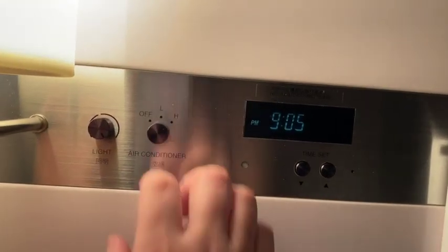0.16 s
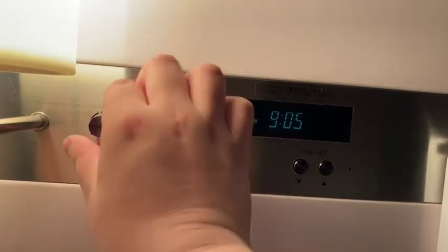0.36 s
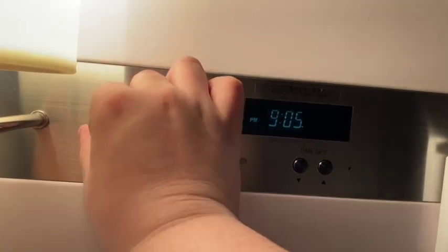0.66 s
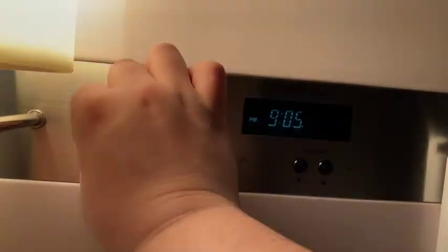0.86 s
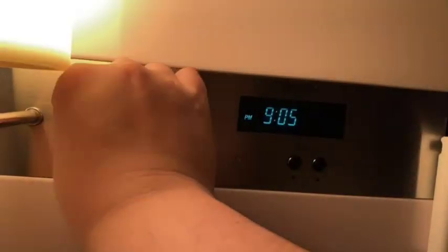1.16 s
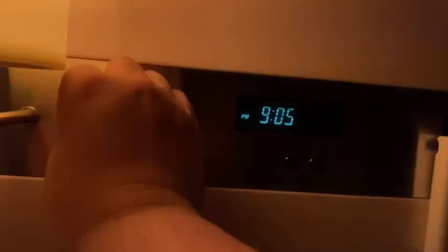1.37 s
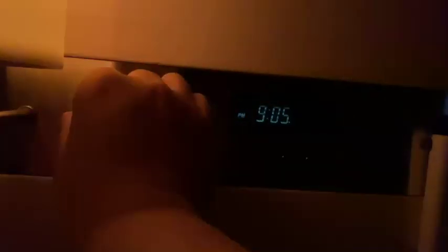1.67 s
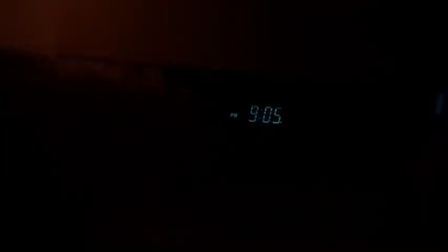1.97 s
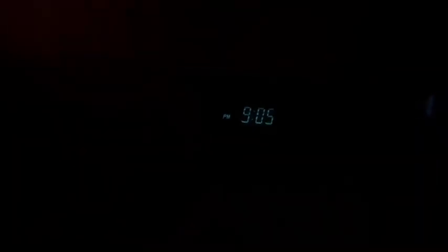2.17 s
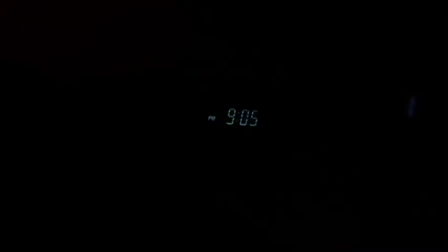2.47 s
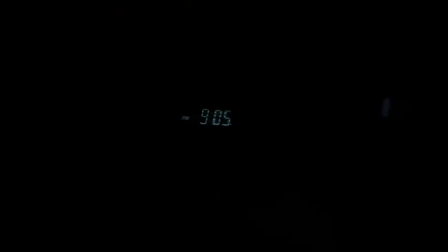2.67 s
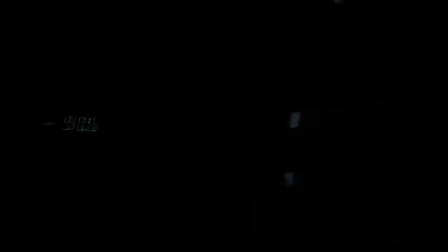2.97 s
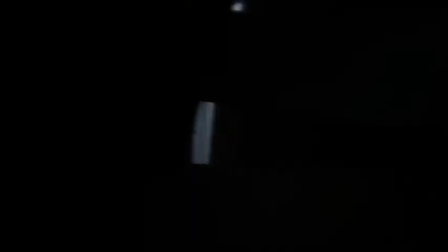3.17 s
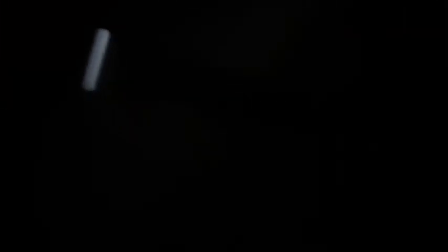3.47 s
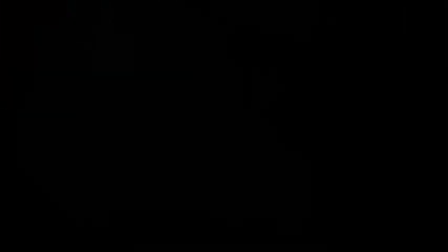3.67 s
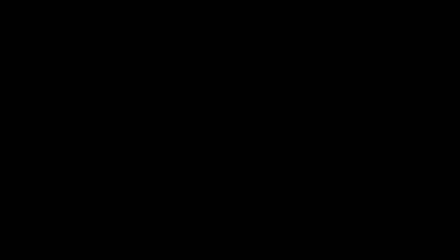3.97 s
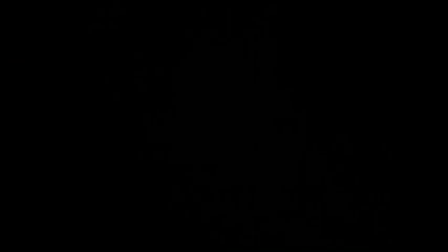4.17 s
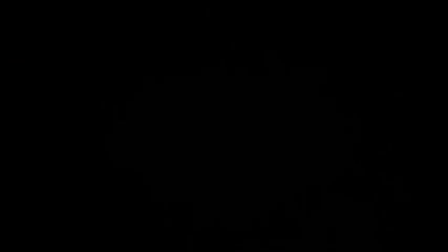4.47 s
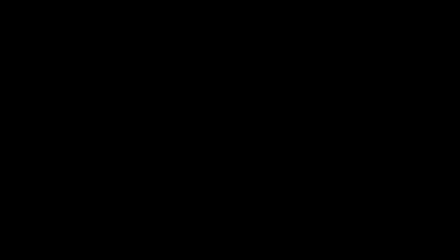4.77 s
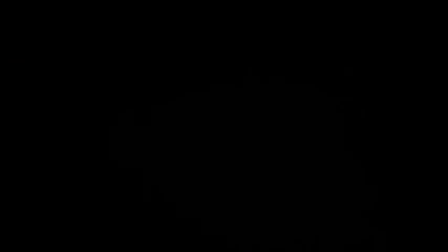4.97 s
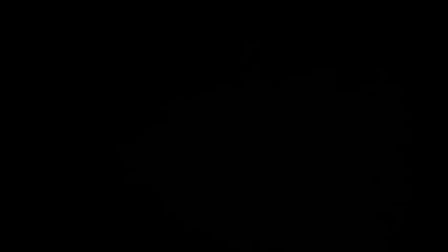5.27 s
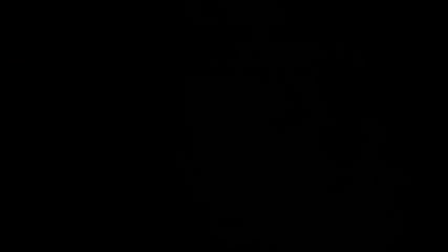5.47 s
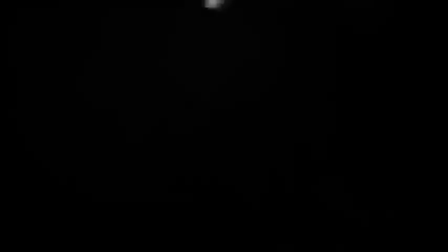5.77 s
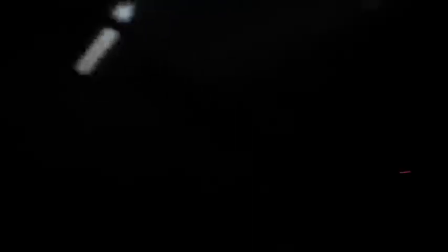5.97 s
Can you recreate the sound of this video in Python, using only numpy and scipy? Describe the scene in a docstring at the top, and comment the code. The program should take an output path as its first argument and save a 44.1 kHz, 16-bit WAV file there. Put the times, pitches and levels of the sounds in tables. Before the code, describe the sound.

A small, close-walled sleeping cabin, heard through a hand-held stereo microphone. Soft low ventilation rumbles steadily throughout, with little treble. From 0.2 to 1.6 seconds fingers very faintly knock and brush a knob and metal panel; slightly firmer dull taps come at 2.0. At about 2.45 a stiff switch snaps: a tight cluster of contacts within some hundredths of a second, bright at first, then heavier, ringing the thin metal. The wall answers with a short hollow boom near 260 hertz and a rattle fading within about 0.3 seconds. Small bumps follow around 2.7 to 2.9. From 3.0 bedding rushes and rubs, while a rough, sagging creak groans from 3.3 to 3.8. A sharp tick falls at 3.9. Cloth movement is strongest around 4.4 to 4.85, with low microphone thuds, then eases. Another tick and knock come at 5.4, a knock at 5.57; rustling continues until 6.1.

```python
"""In a small sleeping cabin with softly rumbling ventilation, a knob switch on a metal wall panel snaps over.
Fingers knock and brush the panel before; afterwards someone turns over, bedding rushes and rubs,
the frame creaks and the hand-held microphone takes up low bumps. Shaped noise makes the air, the bedding
and the rattle of the walls; struck resonances make the panel and the knocks; wavering tones the boom and creak."""
import sys
import numpy as np
from scipy import signal
from scipy.fft import rfft, irfft, next_fast_len
from scipy.io import wavfile

SR = 44100
rng = np.random.default_rng(int(sys.argv[2]) if len(sys.argv) > 2 else 0)


def waveform_to_disk(signal):
    """Save audio, clipped to [-1, 1], as 16-bit WAV at the path in sys.argv[1]."""
    frames = np.transpose(np.atleast_2d(signal))
    scaled = np.clip(frames, -1, 1) * 32767
    samples = np.round(scaled).astype(np.int16)
    wavfile.write(sys.argv[1], SR, samples)


N = 269451

# Blows of the switch contacts. Each row: time in seconds, level in dB, sharpness as a treble limit in Hz.
CONTACTS = [(2.4545, -27, 12300), (2.4547, -41, 12000), (2.4557, -26, 13000), (2.4572, -32.5, 9000),
            (2.4588, -25, 3000), (2.4603, -21, 2700), (2.4652, -19, 1200), (2.4665, -17, 1100),
            (2.4711, -36, 4000), (2.4728, -40, 7000), (2.4838, -39, 7000), (2.5085, -42, 3500)]
# Left-right likeness of bedding, handling and rattle. Each row: frequency in Hz, shared part of the power (0 to 1).
CLOSE_ALIKE = [(60, 0.37), (130, 0.57), (290, 0.65), (640, 0.5), (1400, 0.15), (3000, 0.047), (7000, 0.3),
               (15000, 0.094)]
# Turning over, seen from the microphone. Each row: time in seconds, extra level of the hiss below 3 kHz in dB,
# lean to the left in dB.
TURNING = [(2.6, 6, 1), (2.95, -1, 1), (3.2, 1, 3), (3.6, 1.5, 1.5), (3.95, 2.5, 2.5), (4.2, -1.5, 1),
           (4.45, 0.5, 0), (4.63, 4.5, 0), (4.75, -3, 0.5), (5.0, 0.5, .5), (5.6, -0.5, .5), (6.11, 1.5, 1)]
LEFT_LAG_S = 0.000446   # the left port lies further from the sources


def amp(db):
    """dB to gain."""
    return 10 ** (np.asarray(db) / 20)


def rms_one(x):
    """Scale to rms 1."""
    return x / np.sqrt(np.mean(x ** 2) + 1e-20)


def lean_left(db):
    """Channel gains, as a column, that make the left louder than the right by so many dB."""
    return amp([[db / 2], [-db / 2]])


def click_at(s, height):
    """A single-sample click at a time in seconds."""
    click = np.zeros(N)
    click[round(s * SR)] = height
    return click


def low_pass(x, order, hz):
    """Roll off the treble above hz."""
    return signal.sosfilt(signal.butter(order, hz, fs=SR, output="sos"), x)


def in_time(rows):
    """Columns of a curve table, one value a sample."""
    s, *columns = np.transpose(rows)
    return [np.interp(np.arange(N) / SR, s, c) for c in columns]


def at_hz(points, hz):
    """Read a curve over frequency on a log axis."""
    point_hz, value = np.transpose(points)
    return np.interp(np.log(hz), np.log(point_hz), value)


def drift(rate):
    """Slow chance of spread 1: white noise through two equal low-passes at rate (Hz)."""
    step = 40   # samples between the computed points
    r = np.exp(-2 * np.pi * rate * step / SR)
    white = rng.standard_normal(N // step + 2002)
    slow = signal.lfilter([1], [1, -2 * r, r * r], white)[2000:]   # skip the settling
    return np.interp(np.arange(N) / step, np.arange(len(slow)), rms_one(slow))


def ring(clicks, hz, t60):
    """A damped resonance: a unit click sets a sine ringing from height 1, 60 dB down after t60 seconds."""
    r, w = amp(-60 / (t60 * SR)), 2 * np.pi * hz / SR
    return signal.lfilter([0, np.sin(w)], [1, -2 * r * np.cos(w), r * r], clicks + 1e-18)


def noise(spectrum, likeness, shared_db, own_db, rate, envelope=lambda hz: 1):
    """Stereo noise of a given spectrum, in octave bands that flicker partly together; scaled before flicker."""
    hz = np.maximum(np.fft.rfftfreq(N + N % 2, 1 / SR), 1)
    alike = np.clip(at_hz(likeness, hz), 0, 1)
    common, left, right = rfft(rng.standard_normal((3, N + N % 2))) * amp(at_hz(spectrum, hz))
    late = np.exp(-2j * np.pi * hz * LEFT_LAG_S)
    shared = np.array([common * late, common])
    pair = np.sqrt(alike) * shared + np.sqrt(1 - alike) * np.array([left, right])
    scale = np.std(irfft(pair))
    out, together = 0, drift(rate)
    low, high = np.log2(spectrum[0][0]), np.log2(spectrum[-1][0])
    for centre in np.arange(np.floor(low), high + 1):
        # overlapping windows that sum to 1
        window = np.cos(np.clip(np.log2(hz) - centre, -1, 1) * np.pi / 2) ** 2
        band = irfft(pair * window)[:, :N]
        flicker = amp(shared_db * together + own_db * drift(rate))
        out = out + band * flicker * envelope(2 ** centre)
    return out / scale


def crackle(per_s, low_hz, high_hz, spread_db, order):
    """Sparse uneven clicks in one band, own in each channel; rms 1."""
    sizes = amp(spread_db * np.minimum(rng.exponential(1, (2, N)), 4))
    sizes = sizes * rng.choice([-1, 1], (2, N))
    struck = rng.random((2, N)) < per_s / SR
    sos = signal.butter(order, [low_hz, high_hz], "band", fs=SR, output="sos")
    return rms_one(signal.sosfilt(sos, sizes * struck + 1e-18))


def swell(s, attack_s, hold_s, release_s):
    """Rises straight, holds at 1, then dies exponentially."""
    t = np.arange(N) / SR - s
    return np.clip(t / attack_s, 0, 1) * np.exp(-np.maximum(t - attack_s - hold_s, 0) / release_s)


def push(s, hz, cycles):
    """A brief rounded wiggle centred on s: a sine under a bell whose width is set by cycles."""
    out = np.zeros(N)
    near = np.arange(round((s - .1) * SR), min(round((s + .1) * SR), N))
    t = near / SR - s
    out[near] = np.exp(-2 * (t * hz / cycles) ** 2) * np.sin(2 * np.pi * hz * t)
    return out


def burst(s, length_s, hz, spread, attack):
    """A puff of noise around one pitch, rms 1 before its rise and fade; attack is a share of its length."""
    t, out, start = np.arange(SR // 2) / SR, np.zeros(N + SR), round(s * SR)
    sos = signal.butter(3, [hz / spread, min(hz * spread, 14000)], "band", fs=SR, output="sos")
    puff = rms_one(signal.sosfilt(sos, rng.standard_normal(SR))[-len(t):])
    out[start:start + len(t)] = puff * (1 - np.exp(-t / (attack * length_s))) * np.exp(-t / length_s)
    return out[:N]


def wavering(hz, width_hz, steady):
    """A rough narrow tone: a sine whose height and phase wander about a steady part."""
    phase = 2 * np.pi * np.cumsum(hz * np.ones(N)) / SR
    tone = (drift(width_hz) + steady) * np.sin(phase) + drift(width_hz) * np.cos(phase)
    return tone / np.hypot(1, steady)


def ventilation():
    """Steady low-heavy air noise, alike in both channels only in the bass."""
    # Colour of the air. Each row: frequency in Hz, relative level in dB per Hz.
    air_colour = [(12,-49), (20,-18), (54,-8.5), (106,-6.5), (156,-18.5), (200,-16.5), (300,-27), (400,-29),
                  (480,-33), (855,-34.5), (960,-46), (2930,-55), (8000,-63), (12400,-64), (13200,-89)]
    # Each row: frequency in Hz, left-right likeness (0 to 1).
    air_alike = [(60, 0.94), (130, 0.97), (290, 0.19), (640, 0.23), (1400, 0.13), (3000, 0.1),
                 (15000, 0.077)]
    air = noise(air_colour, air_alike, shared_db=.2, own_db=.6, rate=8)
    return amp(-52.5) * air * lean_left(3)


def hands():
    """Knocks are a damped ring with a puff of noise about their pitch; brushes swell and fade."""
    # Soft knocks and ticks of hands and frame. Each row: start in seconds, level in dB, pitch in Hz,
    # t60 of the puff in seconds, lean to the left in dB.
    knock_rows = [(.301, -68, 900, 0.049, 0), (.911, -65, 850, 0.15, -3), (1.1, -75.5, 889, 0.14, -15),
                  (1.17, -76, 785, 0.15, -5), (1.292, -78, 643, 0.061, -6), (1.425, -71, 870, 0.48, -10),
                  (2.001, -53, 440, 0.077, 2), (2.038, -60, 336, 0.057, -2), (2.676, -54, 760, 0.078, 2),
                  (2.705, -69, 2120, 0.24, 7), (2.866, -49, 67, 0.15, 4), (4.049, -48, 250, 0.068, 1),
                  (5.4123, -41.5, 584, 0.034, -20), (5.565, -40, 465, 0.071, -2)]
    # Dry brushes of skin on the knob. Each row: start in seconds, level in dB, fading time in seconds, pitch in Hz.
    brush_rows = [(0.18, -75, 0.036, 10700), (.905, -79, .025, 3500), (0.903, -82, 0.02, 6700),
                  (1.185, -86, .025, 10800), (1.298, -69, 0.018, 11200), (1.42, -71, 0.035, 1900),
                  (1.527, -67, 0.062, 710), (1.535, -78, .035, 5600), (1.53, -66, 0.045, 1200),
                  (1.522, -77, 0.035, 11500), (2.0, -81, 0.016, 5500)]
    ring_share = 0.11   # the pure ring dies sooner than the puff
    knocks = 0
    for s, db, hz, t60, lean_db in knock_rows:
        pure = ring(click_at(s, 1), hz, t60 * ring_share)
        puff = burst(s, t60 / np.log(1000), hz, spread=1.62, attack=0.099)
        knocks = knocks + amp(db) * (pure + puff) * lean_left(lean_db)
    brushes = sum(amp(db) * burst(s, fade_s, hz, spread=1.27, attack=0.55)
                  for s, db, fade_s, hz in brush_rows)
    return knocks + brushes


def ticks():
    """Sharp ticks of the frame: a short rounded ring, some with a bare crack in front."""
    # Each row: start in seconds, level in dB, pitch in Hz, length in cycles, share of bare crack,
    # lean to the left in dB.
    tick_rows = [(.3015, -63, 1100, 1.2, 0, 0), (1.2955, -67, 900, 1.2, .5, -3),
                 (1.4275, -67, 1900, 2.0, 0, -3), (3.8827, -33.5, 1100, 1.4, .9, 6),
                 (5.4122, -33, 2600, 1.6, 0, -4)]
    out = np.zeros((2, N))
    for s, db, hz, cycles, crack, lean_db in tick_rows:
        click = low_pass(click_at(s, crack), 4, 13000)
        bare_crack = ring(click, 9600, 0.0026) + .5 * ring(click, 2900, 0.008)
        tick = push(s + cycles / hz / 2, hz, cycles) + bare_crack
        out += amp(db) * tick * lean_left(lean_db)
    return out


def cabin(x):
    """Close walls: eight damped feedback delays a side, each pass losing level and treble."""
    t60_s, wall_cut_hz = 0.18, 6900
    size = next_fast_len(N + SR)
    w = 2 * np.pi * np.fft.rfftfreq(size)   # radians a sample
    dull = 1 / (1 + 1j * w * SR / (2 * np.pi * wall_cut_hz)) ** 0.41
    out = np.zeros((2, len(w)), complex)
    for k, lag in enumerate(rng.uniform(.003, 0.017, 16) * SR):
        loop = amp(-60 * lag / SR / t60_s) * dull * np.exp(-1j * w * lag)
        out[k % 2] += loop / (1 - loop) * (-1) ** (k // 2)
    return irfft(out * rfft(x, size), size)[:, :N]


def switch():
    """Each contact of the spring strikes every panel mode through its own softness."""
    # Ringing modes of the metal panel. Each row: frequency in Hz, level in dB, t60 in seconds.
    panel_modes = [(304, -10, 0.04), (581, -13, 0.059), (692, -13, 0.054), (874, -7, 0.037),
                   (1317, -9.5, 0.066), (1510, -13, 0.032), (2205, -5, 0.03), (2410, -13.5, 0.054),
                   (2728, -9.5, 0.062), (2906, -7.5, 0.077), (3490, -9, 0.043), (4060, -17, 0.051),
                   (4145, -15, 0.073), (6440, -4, 0.011), (12550, 10.5, 0.0034)]
    clicks = np.array([low_pass(click_at(s, amp(db)), 2, min(sharp_hz, 20000))
                       for s, db, sharp_hz in CONTACTS])
    # every contact drives each mode by a slightly different amount
    strength = amp(rng.normal(0, 1.5, (len(panel_modes), len(CONTACTS))))
    strength = strength * (-1) ** np.arange(len(panel_modes))[:, None]
    bare_blow = amp(2) * clicks.sum(axis=0)
    return bare_blow + sum(amp(db) * ring(gains @ clicks, hz, t60)
                           for gains, (hz, db, t60) in zip(strength, panel_modes))


def rattle():
    """Too many wall and cabin modes to tell apart: noise that dies band by band."""
    # Wall and cabin answering the snap. Each row: frequency in Hz, relative level in dB per Hz.
    answer_colour = [(210, -24), (350, -4), (456, -17.5), (934, -10.5), (1110, -15), (1300, -20),
                     (2200, -13.5), (4040, -15.5), (5100, -22), (6350, -18.5), (7540, -26), (12600, -34),
                     (13800, -35), (14500, -54)]
    # Each row: frequency in Hz, t60 in seconds.
    answer_t60 = [(350, 0.44), (700, 0.24), (1400, 0.29), (2800, 0.27), (5600, 0.17), (11000, 0.2)]
    t = np.arange(N) / SR - CONTACTS[0][0]

    def dying(hz):
        return (t > 0) * amp(-60 * np.maximum(t, 0) / at_hz(answer_t60, hz))

    return amp(-27) * noise(answer_colour, CLOSE_ALIKE, shared_db=0, own_db=1, rate=59, envelope=dying)


def boom():
    """The hollow wall takes up the snap a moment later and hums on two close notes."""
    hz, delay_s = 263, 0.0236
    lower = wavering(hz, width_hz=12, steady=2.2)
    upper = wavering(1.18 * hz, width_hz=12, steady=2.5)
    shape = swell(CONTACTS[0][0] + delay_s, attack_s=0.0055, hold_s=0.062, release_s=0.01)
    return amp(-39) * shape * (lower + amp(-7) * upper)


def bedding():
    """Cloth sliding on cloth: a bright hiss, a duller rub and lumpy bumps on the microphone."""
    # Colours of the hiss, the rub and the handling rumble. Each row: frequency in Hz, relative level in dB per Hz.
    hiss_colour = [(530, -47), (900, -18), (988, -7.5), (1420, -12), (2230, -8), (3590, -9.5),
                   (4530, -10.5), (5650, -11.5), (6650, -8.5), (7920, -19.5), (9210, -14), (10200, -17.5),
                   (12600, -19), (13900, -24.5), (14500, -69)]
    rub_colour = [(120, -41), (200, -7.5), (236, -3), (398, 1.5), (441, -0.5), (663, 0), (1300, -6.5),
                  (1690, -8.5), (2860, -120)]
    rumble_colour = [(15, -71), (25, -15), (65, 3.5), (102, -12), (140, 4.5), (188, -10), (260, -4),
                     (340, -18.5), (570, -120)]
    # Turning over. Each row: time in seconds, cloth hiss in dB, rub over the hiss in dB,
    # extra treble of the hiss in dB.
    slide = [(2.72, -71, 7, 0.5), (2.84, -71.5, 1, 2), (3.01, -58.5, -3.5, -2), (3.3, -50, 4, -7.5),
             (3.62, -46.5, -2, -1.5), (3.79, -50, -3, -7.5), (4.03, -46.5, -2, -7), (4.18, -51, -1.5, -5),
             (4.23, -46.5, -4.5, -2.5), (4.48, -43.5, 2, -4.5), (4.56, -43, -2.5, -1.5), (4.64, -41, 0, -3),
             (4.72, -40, -6, -2.5), (4.84, -43, -2.5, -2.5), (4.92, -47, -2, -1), (5.02, -50, 0.5, -3.5),
             (5.14, -48.5, -1.5, -3), (5.27, -49.5, -4.5, -2), (5.33, -47, -0.5, -3.5), (5.46, -49, -2, -4),
             (5.57, -45, -3, -1), (5.87, -45.5, 2, -5), (6.0, -47, -1.5, -4), (6.11, -47.5, -1.5, -6.5)]
    # Bumps of the hand on the microphone. Each row: time of the top in seconds, rumble in dB, thud in dB, thud in Hz.
    bump_rows = [(2.702, -51, -56, 120), (3.889, -59, -43, 110), (3.945, -51, -37.5, 149),
                 (4.039, -46, -45, 100), (4.218, -47, -52, 151), (4.433, -43, -39, 170),
                 (4.524, -46, -37, 60), (4.631, -48, -39, 70), (4.699, -51, -41, 100),
                 (4.835, -43, -32.5, 111), (4.909, -45.5, -43, 109), (5.59, -54, -46, 100)]
    fade_in_s, rise_s, fall_s = .15, 0.015, 0.059
    hiss_db, body_db, treble_db = in_time(slide)
    middle_db = in_time(TURNING)[0]
    moving = swell(slide[0][0] - fade_in_s, fade_in_s, N / SR, 1)

    def tilt(hz):
        # the extra treble sets in at 4 kHz and is full from 8 kHz
        return amp(treble_db * np.clip(np.log2(hz / 4000), 0, 1) + middle_db * (hz < 3000))

    hiss = noise(hiss_colour, CLOSE_ALIKE, shared_db=.7, own_db=1.2, rate=12, envelope=tilt)
    hiss = hiss + amp(-11) * crackle(160, 600, 4500, spread_db=2, order=3)
    rub = noise(rub_colour, CLOSE_ALIKE, shared_db=0.18, own_db=2.5, rate=21.5)
    cloth = moving * amp(hiss_db) * (hiss + amp(body_db) * rub)

    rumble = noise(rumble_colour, CLOSE_ALIKE, shared_db=0, own_db=0.8, rate=13)
    # small random knocks within the rumble
    rumble = rumble + amp(-6.5) * crackle(45, 92, 373, spread_db=3.5, order=2)
    # steady handling follows 0.88 of the swing of the hiss: -53.5 dB where the hiss is at -46.5 dB
    handling = moving * amp(-53.5 + 0.88 * (hiss_db + 46.5))
    bumps = sum(amp(db) * swell(s - rise_s, rise_s, 0, fall_s) for s, db, _, _ in bump_rows)
    thuds = sum(amp(db) * push(s, hz, cycles=0.99) for s, _, db, hz in bump_rows)
    return cloth + (handling + bumps) * rumble + thuds


def creak():
    """The frame groans as the weight shifts: a sagging, wobbling rough tone with its octave."""
    start_s, length_s, attack_s = 3.3, 0.505, 0.23
    pitch_hz, sag_hz_per_s, wobble_hz = 465, 70, 16
    since = np.clip(np.arange(N) / SR - start_s, 0, length_s)
    hz = pitch_hz - sag_hz_per_s * since + wobble_hz * drift(6.17)
    shape = swell(start_s, attack_s, length_s - attack_s, release_s=0.012)
    groan = wavering(hz, width_hz=38, steady=1)
    octave = wavering(2 * hz, width_hz=38, steady=.5)
    return amp(-49.5) * shape * (groan + amp(-12.5) * octave)


def scene():
    """The panel leans left in level; the cabin walls answer it, swallowing the highest treble."""
    vent, touch, tick, snap = ventilation(), hands(), ticks(), switch()
    heard = snap + (amp(4) * touch + amp(-4) * tick).mean(axis=0)   # what reaches the walls
    room = amp(-13.5) * cabin(low_pass(heard, 2, 9000))
    near = snap + boom()
    panel = np.array([np.roll(near, round(LEFT_LAG_S * SR)), near]) + rattle()
    lean_db = in_time(TURNING)[1]
    turning_over = (bedding() + creak()) * amp([lean_db / 2, -lean_db / 2])
    return panel * lean_left(1.8) + touch + tick + room + vent + turning_over


def record(dry):
    """The top is cut steeply: 70 dB down from 16.5 kHz."""
    return signal.sosfilt(signal.cheby2(14, 70, 16500, fs=SR, output="sos"), dry)


dry = scene()
out = record(dry)
waveform_to_disk(out)
```